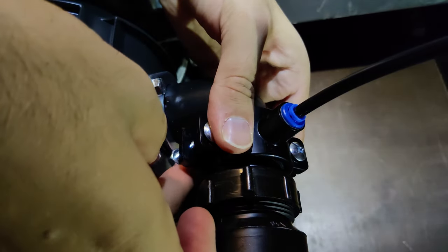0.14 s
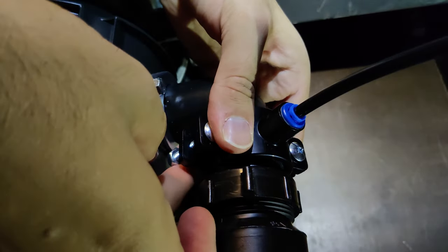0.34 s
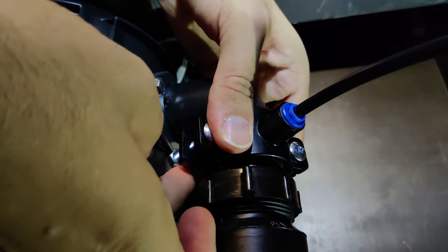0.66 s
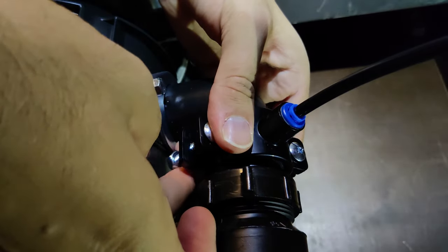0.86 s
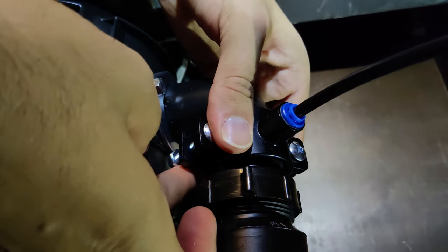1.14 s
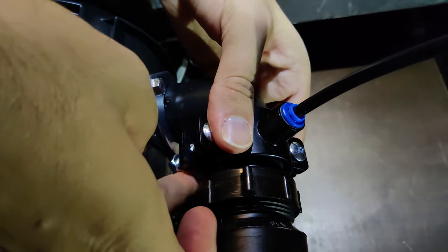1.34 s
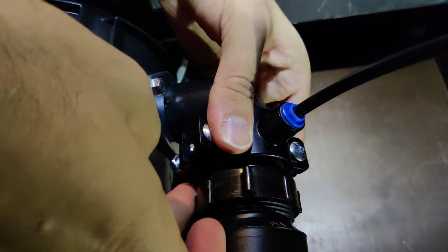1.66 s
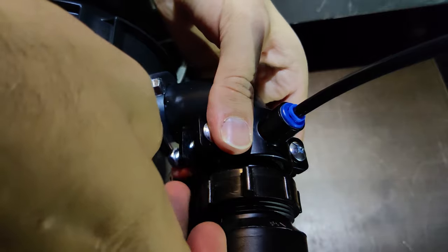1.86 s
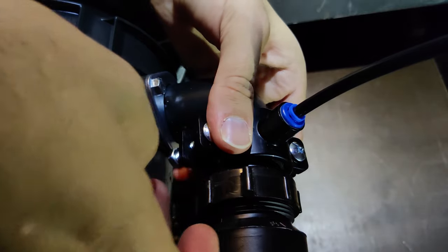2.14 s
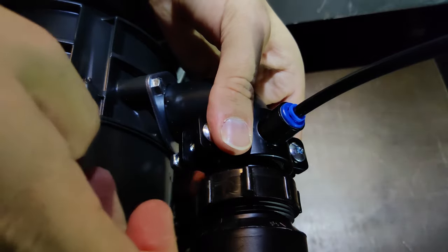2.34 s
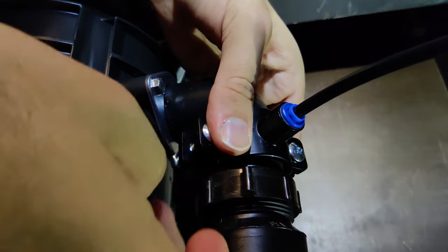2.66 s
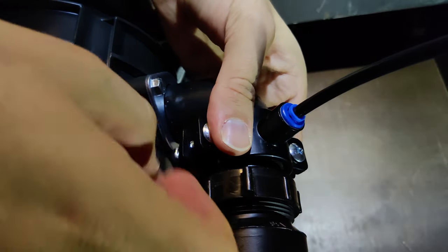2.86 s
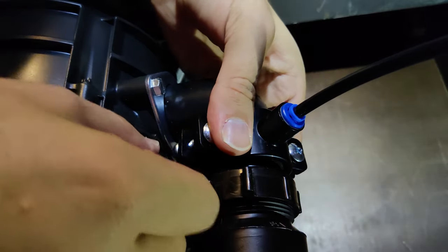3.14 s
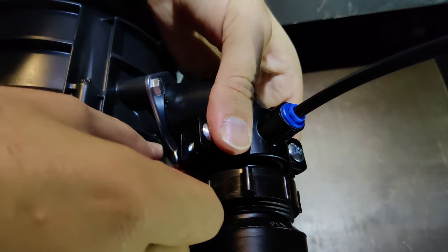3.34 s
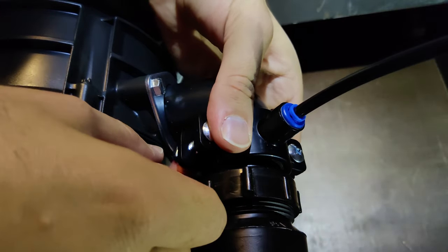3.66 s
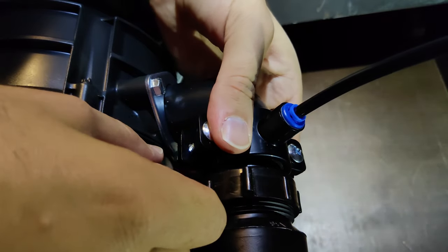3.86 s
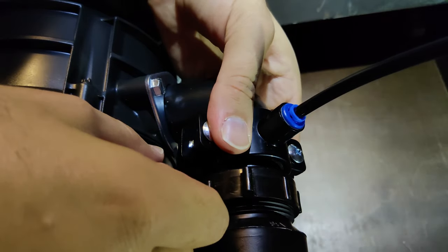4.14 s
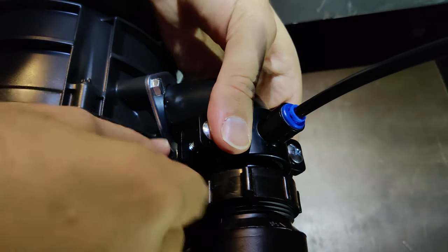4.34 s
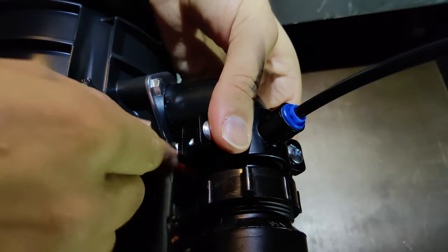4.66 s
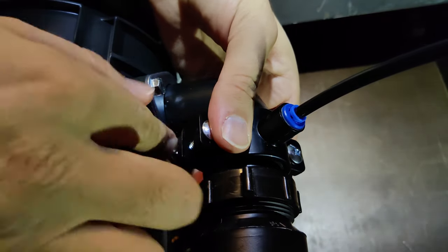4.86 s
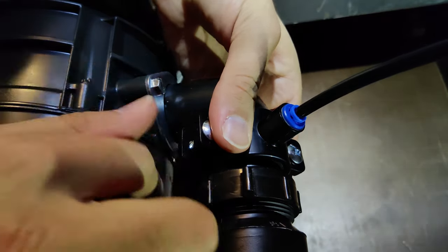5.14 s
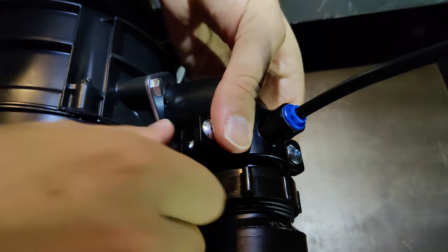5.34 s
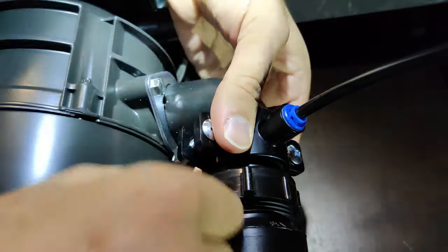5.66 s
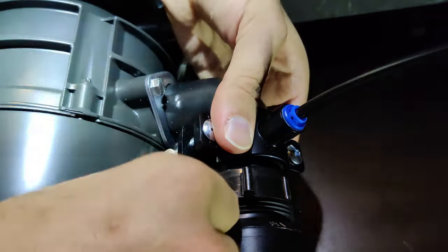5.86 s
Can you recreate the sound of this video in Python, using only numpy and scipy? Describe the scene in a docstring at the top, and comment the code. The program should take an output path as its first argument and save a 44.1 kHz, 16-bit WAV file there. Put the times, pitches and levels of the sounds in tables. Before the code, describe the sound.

Short gritty metal scrapes, clinks and knocks as fingers thread nuts onto a plastic pipe clamp, over low handling rumble and faint hiss.

```python
"""Short gritty scrapes, clinks and knocks, close up: fingers spin nuts onto the bolts of a plastic clamp
under a sink. Each turn is a run of tiny thread slips that rings nut, bolt, clamp and pipe; between turns
the loose bolt knocks in the clamp. The cabinet adds a short tail. Skin rubs, the hand thuds on the
housing, and the hand-held microphone rumbles, with two soft pops, over a faint hiss."""
import sys
import numpy as np
from scipy import signal
from scipy.fft import rfft, irfft
from scipy.io import wavfile
from scipy.ndimage import uniform_filter1d

SR = 44100
rng = np.random.default_rng(int(sys.argv[2]) if len(sys.argv) > 2 else 0)


def wrap_up_sound(samples):
    """Save the sound to the file named by the first command line argument, as 16-bit audio."""
    columns = np.atleast_2d(samples).T
    # keep every value between -1 and 1, then stretch to whole-number steps
    tamed = np.clip(columns, -1, 1)
    steps = np.round(tamed * 32767).astype(np.int16)
    wavfile.write(sys.argv[1], SR, steps)


N = 264159

# hand activity: time_s, rubbing_db, thrum_db
HANDS = [(0, -51, -46.5), (.45, -49, -49), (1.2, -54, -53), (1.6, -51, -47), (2.1, -46, -41.5),
         (2.5, -51, -41), (2.85, -45.5, -41), (3.08, -47.5, -37.5), (3.45, -48.5, -39), (3.7, -47, -39),
         (4.33, -46, -41), (4.62, -55, -48.5), (4.87, -42.5, -40), (5.05, -61, -49.5), (5.21, -45, -40.5),
         (5.42, -52.5, -43), (5.62, -45, -38), (5.99, -51, -38.5)]


def hardware():
    """Hollow pipe, plastic clamp, steel bolt and nut, each shaken by every blow and scrape."""
    # ringing modes: pitch_hz, level_db, t60_s
    pipe_modes = [(357, -9, 0.061), (452, -2, 0.095), (504, 0, 0.082), (696, -2.5, 0.084),
                  (792, -11, 0.034)]
    clamp_modes = [(838, -1, 0.062), (941, -1, 0.062), (1048, 0, 0.063), (1203, -25.5, 0.078),
                   (1219, 6, 0.037), (1289, -6.5, 0.074), (1455, -0.5, 0.048), (1545, 5.5, 0.027),
                   (1724, -7.5, 0.11), (1790, 3.5, 0.034), (1966, -4, 0.081), (2134, 3.5, 0.031),
                   (2370, 5, 0.023), (2508, 0.5, 0.039), (2630, 9.5, 0.012), (3000, -1, 0.042),
                   (3030, -19, 0.051), (3130, -23, 0.046)]
    bolt_modes = [(4160, -7, 0.015), (4800, -1, 0.033), (5200, 2, 0.019), (5300, 1.5, 0.014),
                  (5590, -7.5, 0.012), (6196, -3.5, 0.022)]
    nut_modes = [(8700, -9, .04), (9350, -6, 0.032), (9280, -2, 0.058), (9480, 2, 0.058), (9680, -1, 0.045),
                 (9970, -9, .035), (11130, -16, 0.026), (11500, -14, .02)]
    # blur of dense, short-lived modes: freq_hz, level_db
    pipe_blur = [(90, -15), (160, -7.5), (240, -4), (300, -8.5), (350, -4.5), (420, 1), (520, -3),
                 (600, -8), (740, -5.5), (950, -18.5), (2000, -62)]
    clamp_blur = [(400, -32.5), (700, -38), (900, -3.5), (2200, -3.5), (3300, -7), (4100, -19.5),
                  (8000, -52)]
    bolt_blur = [(1800, -54), (3100, 4.5), (3600, 1.5), (4100, 1), (5000, 5), (7000, 7), (8300, 4),
                 (9500, -12), (11500, 2), (13000, -9), (16000, 1)]
    nut_blur = [(5000, -52), (7800, -8), (8800, -0.5), (9500, 3.5), (10400, -0.5), (11600, -10),
                (12600, -11), (16000, -23)]
    events = turns(), clinks() + knocks()
    pipe = part(*events, column=0, scrape_db=1, blow_db=-1.5,
                modes=pipe_modes, blur=pipe_blur, blur_db=-1.5, blur_t60_s=0.044, build_s=0.0036)
    clamp = part(*events, column=1, scrape_db=1.85, blow_db=-1.82,
                 modes=clamp_modes, blur=clamp_blur, blur_db=-3, blur_t60_s=0.046, build_s=0.0014)
    bolt = part(*events, column=2, scrape_db=1.7, blow_db=-1.5,
                modes=bolt_modes, blur=bolt_blur, blur_db=7, blur_t60_s=0.04, build_s=0.00078)
    nut = part(*events, column=3, scrape_db=1, blow_db=-1,
               modes=nut_modes, blur=nut_blur, blur_db=0, blur_t60_s=0.039, build_s=0.00052)
    return pipe + clamp + bolt + nut


def part(scrapes, blows, column, scrape_db, blow_db, **body):
    """One part's answer to all events; column picks its level. Levels are event energy as 10 ms rms."""
    out = np.zeros(N)
    for start_s, favoured_hz, *levels_db in blows:
        hardness_db = levels_db[2] - levels_db[1]  # metal crack over plastic body
        blow = struck(response(**body), favoured_hz, hardness_db)
        add(out, start_s, amp(levels_db[column] + blow_db) * unit(blow))
    for peak_s, swell_s, *levels_db in scrapes:
        lead_s, force = slips(swell_s, fall_s=0.49 * swell_s)
        scrape = signal.fftconvolve(force, response(**body))
        add(out, peak_s - lead_s, amp(levels_db[column] + scrape_db) * unit(scrape))
    return np.sqrt(0.01 * SR) * out


def response(modes, blur, blur_db, blur_t60_s, build_s, spread_db=4, size=4400):
    """A part's ring: each contact weights the modes anew; the shake takes build_s to spread."""
    t = np.arange(size) / SR
    hz, db, t60_s = np.transpose(modes)[:, :, None]
    contact_db = spread_db * rng.standard_normal(hz.shape)
    phase = rng.random(hz.shape)
    partials = amp(db + contact_db - 60 * t / t60_s) * np.sin(2 * np.pi * (hz * t + phase))
    burst = rng.standard_normal(size) * amp(-60 * t / blur_t60_s)
    dense = signal.fftconvolve(burst, causal(blur))[:size]
    shake = unit(partials.sum(0)) + amp(blur_db) * unit(dense)
    return shake * (1 - np.exp(-t / build_s))


def turns():
    """The nut scrapes along the thread. Rows: peak_s, swell_s, pipe_db, clamp_db, bolt_db, nut_db."""
    # peak_s, swell_s, level_db, bright_db
    scrapes = [(0.216, 0.0036, -46.5, 5), (1.385, 0.01, -44, -12), (1.742, 0.021, -33.5, 0),
               (2.062, .014, -33.5, 4.5), (2.338, .005, -34, 1), (2.353, .006, -30, 3.5),
               (2.434, .008, -46, -1.5), (2.537, 0.0028, -44, -1), (2.67, 0.015, -32.5, 0),
               (2.993, 0.0085, -36.5, 8.5), (3.192, .0035, -37.5, -3), (3.297, 0.027, -31.5, -1),
               (3.338, 0.01, -41, 10.5), (3.581, 0.0082, -31.5, -2.5), (3.904, .009, -30, -2.5),
               (4.002, 0.0092, -40.5, -9), (4.213, 0.0078, -39, -4), (4.239, 0.014, -35.5, 0),
               (4.31, .012, -47.5, 5), (4.843, 0.014, -39, -8), (4.862, 0.0032, -36.5, -6),
               (4.886, 0.0053, -53, 17), (5.142, 0.0045, -45, -1), (5.181, .012, -42.5, 5),
               (5.491, 0.013, -46, -7), (5.565, .007, -44.5, -9), (5.638, .003, -39.5, 5.5),
               (5.657, 0.0043, -29.5, 4.5), (5.68, .007, -42.5, 8)]
    return [(peak_s, swell_s, db - 1.5, db, db - 4.5 + 0.48 * bright_db, db - 2.5 + bright_db)
            for peak_s, swell_s, db, bright_db in scrapes]


def slips(swell_s, fall_s, rate_hz=2200, grit_db=4, catch=2.1, drag=0.029, drag_s=0.018, size=8000):
    """Tiny thread slips grow from a light drag until the thread catches. Returns lead_s, force."""
    lead = size * 3 // 4
    t = (np.arange(size) - lead) / SR
    slipping = rng.random(size) < rate_hz / SR
    clicks = slipping * amp(grit_db * rng.standard_normal(size)) * rng.choice([-1, 1], size)
    clicks[lead] = catch
    clicks = signal.lfilter(*signal.butter(4, 12500, fs=SR), clicks)  # slips are softer than knocks
    before_s, after_s = np.minimum(t, 0), np.maximum(t, 0)
    pressure = np.exp(before_s / swell_s) + drag * np.exp(before_s / drag_s)
    return lead / SR, clicks * pressure * np.exp(-after_s / fall_s)


def clinks(clamp_mode_hz=1325):
    """The nut rocks on the thread. Rows: start_s, favoured_hz, pipe_db, clamp_db, bolt_db, nut_db."""
    # start_s, level_db
    rocks = [(1.739, -28), (1.767, -39), (2.15, -47.5), (2.667, -25), (2.863, -38), (3.077, -37.5),
             (3.38, -37), (3.618, -34.5), (3.636, -35.5), (4.783, -42), (4.825, -44), (5.090, -34.5),
             (5.222, -40), (5.654, -20), (5.813, -25)]
    return [(start_s, clamp_mode_hz, db - 9.5, db - 6.5, db - 11.5, db) for start_s, db in rocks]


def knocks():
    """The loose bolt knocks in its hole, among faint rattles. Rows as in clinks."""
    # start_s, favoured_hz, level_db, hardness_db
    contacts = [(0.722, 1750, -44, -16), (0.912, 1450, -45, -3), (1.612, 1450, -31, -14),
                (1.924, 1120, -31, -2.5), (1.985, 494, -38.5, -18), (2.024, 2890, -36, -6.5),
                (2.2346, 1150, -28, -2), (2.288, 690, -37, -12), (2.416, 473, -43.5, -3.5),
                (2.543, 1350, -29.5, -5.5), (2.559, 1620, -27.5, -15), (2.644, 1500, -34, -2),
                (2.762, 1220, -40.5, -15), (2.876, 1470, -29, -5), (2.915, 1790, -34.5, -19),
                (3.2226, 710, -24.5, -11), (3.466, 1660, -36.5, -11.5), (3.523, 1670, -32.5, -12.5),
                (3.592, 2280, -29, 1), (3.679, 460, -42, -13), (3.7912, 2100, -21.5, -5.5),
                (3.85, 700, -33, -8), (4.118, 2020, -22, -6), (4.142, 1680, -39, -7),
                (4.157, 476, -32, -9.5), (4.174, 480, -44, -1), (4.718, 1980, -29.5, -12),
                (4.752, 1490, -44, -15), (4.860, 1010, -34.5, -16), (5.073, 2080, -39.5, -11),
                (5.153, 1670, -23.5, -11.5), (5.189, 1120, -26.5, -5), (5.533, 1700, -35, -10.5),
                (5.588, 1210, -42, -0.5), (5.663, 480, -29, -17), (5.818, 2050, -27, -7)]
    rows = []
    for start_s, favoured_hz, db, hardness_db in contacts + rattles():
        pipe_db = -13 + 0.67 * db - 4.5 * np.log2(favoured_hz / 1000)  # most from low knocks
        nut_db = db - 5 + 1.73 * hardness_db  # only hard knocks reach the nut
        rows.append((start_s, favoured_hz, pipe_db, db, db + hardness_db, nut_db))
    return rows


def rattles(rate_hz=6, centre_hz=1300, spread_db=3.5, hardness_db=-7.5, count=120):
    """Faint knocks at random moments, stronger while the hands are busy."""
    start_s, chance = rng.random((count, 2)).T * [[N / SR], [count]]
    octaves, force = rng.uniform(-1.21, 1, (count, 2)).T
    thrum_db = curve(HANDS, column=2)[(start_s * SR).astype(int)]
    level_db = thrum_db - 8 + spread_db * force
    rows = np.c_[start_s, centre_hz * 2 ** octaves, level_db, np.full(count, hardness_db)]
    return list(rows[chance < rate_hz * N / SR])


def struck(ring, favoured_hz, hardness_db, focus=2):
    """A blow lifts the modes its point of contact favours; a softer contact is longer and duller."""
    favoured = signal.lfilter(*signal.iirpeak(favoured_hz, Q=9, fs=SR), ring)
    corner_hz = 6500 * amp(hardness_db)
    pole = np.exp(-2 * np.pi * corner_hz / SR)
    return signal.lfilter([1 - pole], [1, -pole], ring + focus * favoured)


def cabinet(x, low_db=-8, high_db=-15, delay_s=0.003, size=22050):
    """Dense reflections from close walls; the treble is weaker and dies sooner."""
    # freq_hz, t60_s
    decay_times = [(150, 1), (500, 0.27), (1500, 0.23), (5000, 0.15), (10000, 0.13), (16000, 0.071)]
    hz, t, bins = signal.stft(rng.standard_normal(size), SR, nperseg=256)
    t60_s = read(decay_times, hz)[:, None]
    decay = amp(-60 * t / t60_s) * np.sqrt(2 * np.log(1000) / (t60_s * SR))  # equal energy per band
    wet = amp(read([(500, low_db), (6000, high_db)], hz))[:, None]
    tail = signal.istft(bins * decay * wet, SR, nperseg=256)[1]
    return signal.fftconvolve(x, np.r_[np.zeros(round(delay_s * SR)), tail])[:N]


def fingers(trim_db=-3, uneven_db=2.5):
    """Skin rubs unevenly over the parts; near the end the hand brushes past as it changes grip."""
    # freq_hz, level_db
    skin_colour = [(200, -27), (300, -7), (380, -3.5), (480, 1.5), (590, -3.5), (696, -12.5), (780, -3.5),
                   (1200, -6.5), (2200, -12.5), (4000, -17), (9400, -21.5), (16000, -26.5)]
    brush_colour = [(1500, -29), (4000, -13), (5500, 5), (8000, 6), (11000, 1), (16000, -3)]
    # time_s, level_db
    brush_level = [(5.2, -75), (5.28, -55), (5.36, -52.5), (5.46, -57), (5.6, -69), (5.8, -72)]
    grip = unit_rms(uniform_filter1d(rng.standard_normal(N), size=900))
    rubbing = noise(skin_colour) * amp(curve(HANDS) + trim_db + uneven_db * grip)
    return rubbing + noise(brush_colour) * amp(curve(brush_level))


def thuds(rise_s=0.022, fall_s=0.033, size=11000):
    """The housing booms briefly under each bump of the hand."""
    # start_s, level_db
    bumps = [(1.41, -43.5), (2.334, -35.5), (3.235, -36), (5.155, -30.5), (5.19, -32), (5.659, -30)]
    # freq_hz, level_db
    housing_colour = [(50, -26), (80, 0.5), (107, 8), (132, -8), (156, -4), (190, -11), (250, -7),
                      (300, -24), (380, -18), (600, -44)]
    out, t = np.zeros(N), np.arange(size) / SR
    housing = causal(housing_colour, size=8192)
    push = (1 - np.exp(-t / rise_s)) * np.exp(-t / fall_s)
    for start_s, db in bumps:
        boom = signal.fftconvolve(push * rng.standard_normal(size), housing)
        add(out, start_s, amp(db) * np.sqrt(fall_s * SR) * unit(boom))
    return out


def handling():
    """The hand-held microphone: a deep rumble, and a low thrum that follows the hands."""
    # freq_hz, level_db
    rumble_colour = [(1, -45), (5, -12), (13, 0), (17, -3), (24, -7.5), (31, -14.5), (37, -33), (44, -18),
                     (50, -45), (70, -37), (200, -86)]
    thrum_colour = [(35, -14), (55, 5), (76, -1), (88, -1), (107, 2.5), (132, -12.5), (156, -3.5),
                    (175, -11.5), (205, -10), (250, -12.5), (300, -27), (600, -56)]
    # time_s, level_db
    rumble_level = [(0, -19), (.7, -19), (.85, -12.5), (1.1, -18), (2.1, -19.5), (2.4, -16), (3.1, -20.5),
                    (3.35, -16.5), (3.9, -20), (4.45, -15.5), (4.72, -18), (4.99, -14), (5.2, -22),
                    (5.6, -13), (5.99, -18)]
    rumble = swelling(noise(rumble_colour), curve(rumble_level), size=6000)
    thrum = swelling(noise(thrum_colour), curve(HANDS, column=2), size=4000)
    return (rumble + thrum) * signal.windows.tukey(N, 0.008)


def pops(settle_s=0.015, size=4000):
    """Soft low pops: small pressure steps that settle back."""
    # start_s, level_db, polarity
    steps = [(1.0215, -24, 1), (5.0024, -26.5, -1)]
    out = np.zeros(N)
    step = np.exp(-np.arange(size) / SR / settle_s)
    rounded = signal.lfilter([0.3], [1, -0.7], step)
    for start_s, db, polarity in steps:
        add(out, start_s, polarity * amp(db) * rounded)
    return out


def hiss(rumble, steady_db=-51.15, sizzle_db=-56, crest=0.14):
    """Steady hiss; a faint sizzle rises on each crest of the rumble."""
    # freq_hz, level_db
    hiss_colour = [(120, -30), (200, 7.5), (231, 0), (263, -0.5), (321, -5.5), (399, -7), (430, -19.5),
                   (515, -2), (554, -8.5), (827, -1), (874, -1), (1450, -11), (2510, -12.5), (2650, -13),
                   (15500, -17.5)]
    sizzle_colour = [(1500, -29), (4000, -4), (9000, 8), (16000, 2)]
    on_crest = np.clip(rumble / crest, 0, 1) ** 2
    return amp(steady_db) * noise(hiss_colour) + amp(sizzle_db) * on_crest * noise(sizzle_colour)


def amp(db):
    """Decibels to gain."""
    return 10 ** (np.asarray(db) / 20)


def unit_rms(x):
    """Scales to rms 1."""
    return x / np.sqrt(np.mean(x ** 2) + 1e-20)


def unit(x):
    """Scales to energy 1."""
    return x / np.sqrt(np.sum(x ** 2) + 1e-20)


def read(points, hz):
    """Interpolates a table over log frequency."""
    freq_hz, value = np.transpose(points)
    return np.interp(np.log(hz + 1e-3), np.log(freq_hz), value)


def curve(rows, column=1):
    """One column of a time table, per sample."""
    rows = np.array(rows)
    return np.interp(np.arange(N) / SR, rows[:, 0], rows[:, column])


def add(mix, start_s, sound):
    """Mixes a sound in at start_s."""
    span = mix[max(round(start_s * SR), 0):][:len(sound)]
    span += sound[:len(span)]


def noise(colour):
    """Steady coloured noise, rms 1."""
    gain = amp(read(colour, np.fft.rfftfreq(N, 1 / SR)))
    return unit_rms(irfft(rfft(rng.standard_normal(N)) * gain, N))


def causal(colour, size=2048):
    """Minimum-phase response of a colour: starts at once, dies away."""
    log_gain = np.log(amp(read(colour, abs(np.fft.fftfreq(size, 1 / SR)))))
    spectrum = np.exp(np.conj(signal.hilbert(log_gain)))
    return np.fft.ifft(spectrum).real[:size // 2]


def swelling(x, level_db, size):
    """Makes the rms over size samples follow a level curve smoothly."""
    gain = amp(level_db) / np.sqrt(uniform_filter1d(x ** 2, size=size))
    return x * uniform_filter1d(gain, size=size // 2)


def scene():
    """Hardware in the cabinet, over hand noise and hiss; mono."""
    parts, rumble = hardware(), handling()
    return (parts + cabinet(parts) + fingers() + thuds() + rumble + pops() + hiss(rumble))[None]


def record(dry):
    """The microphone's band limit and steady offset."""
    edge_hz, offset = 15850, 0.051
    lowpass = signal.firwin(511, edge_hz, window=("kaiser", 9), fs=SR)
    return signal.oaconvolve(dry, lowpass[None], "same") + offset


dry = scene()
out = record(dry)
wrap_up_sound(out)
```